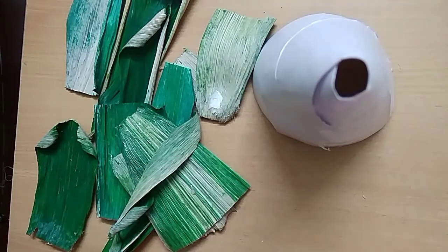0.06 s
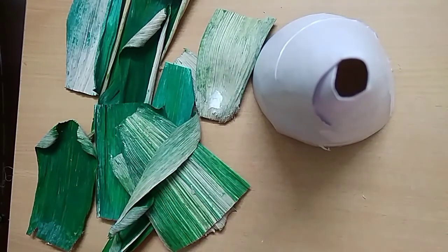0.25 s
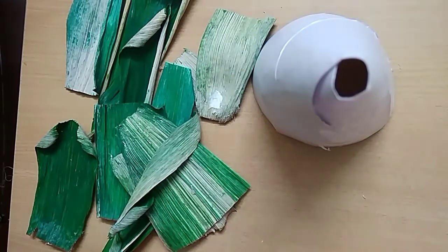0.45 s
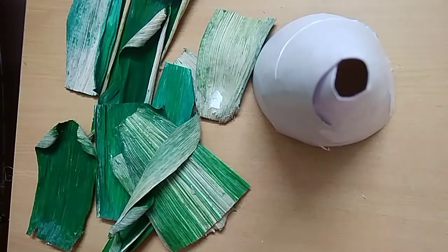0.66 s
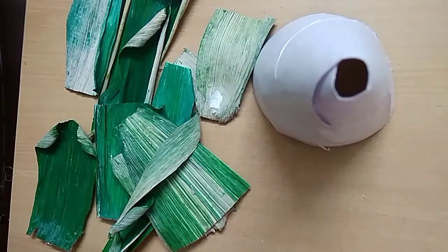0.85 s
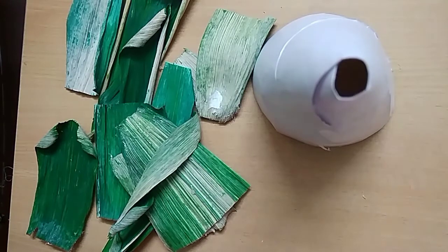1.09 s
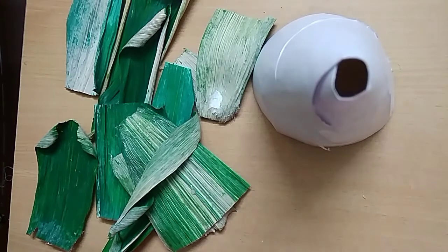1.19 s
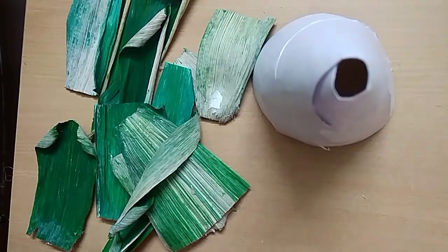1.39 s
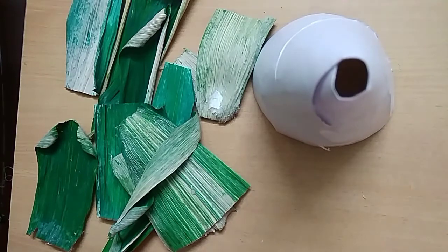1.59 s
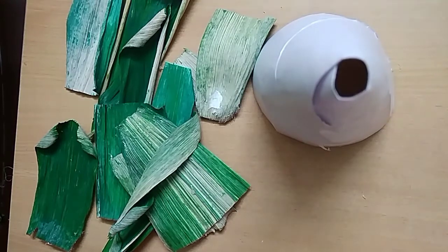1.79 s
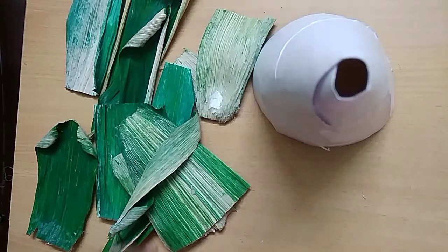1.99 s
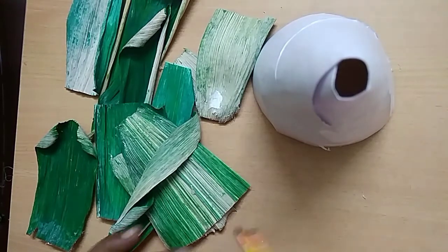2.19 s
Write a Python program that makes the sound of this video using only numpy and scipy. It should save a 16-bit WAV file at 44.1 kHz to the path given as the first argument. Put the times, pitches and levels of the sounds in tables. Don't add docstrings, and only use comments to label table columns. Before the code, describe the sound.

Dry husks rustle in short uneven bursts as hands gather them on a table, with brittle snaps and dull knocks, over a faint low appliance hum; close stereo phone microphone in a small hard room.

```python
import sys
import numpy as np
from scipy import signal
from scipy.fft import rfft, irfft
from scipy.io import wavfile
from scipy.ndimage import uniform_filter1d

SR = 44100
rng = np.random.default_rng(int(sys.argv[2]) if len(sys.argv) > 2 else 0)


def amplitude_ratio(level_db):
    exponent = np.asarray(level_db, float) / 20
    return 10 ** exponent


def log_audio(samples):
    frames = np.atleast_2d(samples).T
    limited = np.clip(frames, -1, 1)
    pcm = np.round(limited * 32767).astype(np.int16)
    wavfile.write(sys.argv[1], SR, pcm)


N = 99225
SPAN = 16384
LN_1000 = np.log(1000)


def curve(table, size):
    hz, db = np.array(table, float).T
    bin_hz = np.arange(size // 2 + 1) * SR / size
    return np.interp(np.log(bin_hz + 1), np.log(hz), db)


def colour(x, db):
    size = 2 * (len(db) - 1)
    cepstrum = irfft(db * np.log(10) / 20)
    cepstrum[1:size // 2] *= 2
    cepstrum[size // 2 + 1:] = 0
    h = irfft(np.exp(rfft(cepstrum)))
    return signal.fftconvolve(x, h / np.sqrt(np.sum(h ** 2)))[:len(x)]


def band(x, hz, width_hz):
    edges = np.clip([hz - width_hz / 2, hz + width_hz / 2], 5, SR / 2.1)
    return signal.sosfilt(signal.butter(1, edges, "band", fs=SR, output="sos"), x)


def unit(x):
    return x / np.sqrt(np.mean(x ** 2))


def walk(rate_hz):
    k = int(SR / rate_hz)
    return unit(uniform_filter1d(uniform_filter1d(rng.standard_normal(N), k), k))


def burst(fade_s):
    t = np.arange(2048) / SR
    h = rng.standard_normal(len(t)) * np.exp(-t / fade_s)
    return h / np.sqrt(np.sum(h ** 2))


def lean(pair, table):
    tilt_db = curve(table, N) / 2
    return np.array([irfft(rfft(p) * amplitude_ratio(s * tilt_db), N) for p, s in zip(pair, (1, -1))])


# freq_hz, level_db (per Hz)
HUM_TONE = [(20, -35.5), (55, -7), (240, -5.5), (330, -16.5), (500, -23.5), (700, -41), (1200, -63.5),
            (16000, -63)]
# freq_hz, width_hz, level_db
HUM_BANDS = [(58.3, 8.4, -63), (123.4, 21, -59), (176.8, 22.2, -60), (228.2, 27.4, -59.5)]
# freq_hz, left_minus_right_db
HUM_SIDE = [(60, 5.5), (250, 6), (500, 19), (2000, 16.5), (6000, -7.5)]


def hum():
    rumble_db, swell_db, likeness = -56, 3, 0.81

    def one_rumble():
        x = amplitude_ratio(rumble_db) * unit(colour(rng.standard_normal(N), curve(HUM_TONE, 8192)))
        for hz, width_hz, db in HUM_BANDS:
            tone = rng.standard_normal(N)
            for _ in range(3):
                tone = band(tone, hz, width_hz * 2)
            x += amplitude_ratio(db + swell_db * walk(2.8)) * unit(tone)
        return x

    shared = np.sqrt((1 + likeness) / 2) * one_rumble()
    differing = np.sqrt((1 - likeness) / 2) * one_rumble()
    return lean([shared + differing, shared - differing], HUM_SIDE)


# freq_hz, level_db (per Hz)
SLIDE_TONE = [(300, -32), (700, -26.5), (1500, -6.5), (2100, -11.5), (2800, -9), (4500, -13), (11000, -0.5),
              (15500, -7)]


def slide_colour(x):
    return colour(x, curve(SLIDE_TONE, 1024))


# freq_hz, level_db (per Hz)
CRUSH_TONE = [(120, -10), (280, -5.5), (470, 3), (750, 0.5), (1100, -5.5), (2000, -7), (5500, -8),
              (9000, -14)]


def crush_colour(x):
    return colour(x, curve(CRUSH_TONE, 1024))


def swarm():
    clicks_per_s, size_spread_db, flicker_db = 13000, 3.5, 1.45
    happens = rng.random(N) < clicks_per_s / SR
    size_db = np.minimum(-np.log(rng.random(N) + 1e-9), 5) * size_spread_db
    clicks = amplitude_ratio(size_db) * happens * np.sign(rng.standard_normal(N))
    return unit(clicks) * amplitude_ratio(flicker_db * walk(285))


def heap():
    return [(slide_colour(swarm()), crush_colour(swarm())) for _ in range(3)]


def placed(x):
    left_lag_s = 0.000264 + .00009 * rng.standard_normal()
    scatter_s, scatter_db, scatter_hz = 0.0038, -2.5, 915
    w = 2j * np.pi * np.arange(SPAN // 2 + 1) * SR / SPAN
    treble_only = (w / (w + 2 * np.pi * scatter_hz)) ** 2
    out = []
    for lag_s in (left_lag_s, 0):
        glint = amplitude_ratio(scatter_db) * rfft(burst(scatter_s), SPAN) * treble_only
        out.append(irfft(rfft(x) * (1 + glint) * np.exp(-w * lag_s)))
    return np.array(out)


def rub(spots, moves):
    rise_db, release_s = 22, 0.0063
    out, t = np.zeros((2, N + 2 * SPAN)), np.arange(SPAN) / SR
    for start_s, rise_s, hold_s, level_db, crush_db in moves:
        risen = t / max(rise_s, 1e-3)
        up = amplitude_ratio(rise_db * (np.clip(risen, 0, 1) - 1)) * np.clip(3 * risen, 0, 1)
        down = np.exp(-np.maximum(t - rise_s - hold_s, 0) / release_s)
        shape = amplitude_ratio(level_db) * up * down / np.sqrt(len(spots))
        i = max(int(start_s * SR), 0)
        for slide, crush in spots:
            rustle = np.roll(slide + amplitude_ratio(crush_db) * crush, -i)[:SPAN]
            out[:, i:i + SPAN] += placed(shape * rustle)
    return out[:, :N]


# start_s, hold_s, level_db
BRUSHES = [(0, 0.051, -69.5), (0.23, 0.11, -56.5), (0.854, 0.048, -57.5), (0.875, 0.041, -54),
           (0.934, 0.082, -56.5), (1.024, 0.05, -44.5), (1.076, 0.046, -45), (1.488, 0.079, -74.5),
           (1.948, 0.042, -55), (2.128, 0.032, -57.5), (2.16, 0.028, -66)]


def brushes(spots):
    rise_s, crush_db = 0.004, -8.5
    return rub(spots, [(start_s, rise_s, hold_s, db, crush_db) for start_s, hold_s, db in BRUSHES])


# start_s, peak_db
SNAPS = [(.050, -66.5), (.152, -60), (0.175, -33), (0.203, -41), (.206, -35.5), (.2244, -26.5), (.470, -21),
         (.4738, -13.5), (.859, -40.5), (.8904, -46), (.908, -35), (1.2405, -23), (1.2589, -21),
         (1.263, -27), (1.2655, -12), (1.2667, -9.5), (1.4736, -41), (1.6077, -46), (1.882, -24),
         (1.901, -32), (1.911, -19), (1.9135, -21), (2.1352, -61), (2.169, -38), (2.181, -41.5)]


def snaps():
    fade_s, gain_db, body_db = 0.00084, 5.5, -7
    out = np.zeros((2, N + 2 * SPAN))
    for start_s, peak_db in SNAPS:
        i = int(start_s * SR)
        puff = np.pad(burst(fade_s), (0, SPAN))[:SPAN]
        puff = slide_colour(puff) + amplitude_ratio(body_db) * crush_colour(puff)
        out[:, i:i + SPAN] += amplitude_ratio(peak_db + gain_db) * placed(puff)
    return out[:, :N]


# start_s, rise_s, hold_s, level_db, crush_db (crush against slide)
STROKES = [(.14, 0.036, .02, -52.5, -10), (.195, .012, 0.023, -42.5, -6.5),
           (.32, 0.028, 0.039, -32.5, -13.5), (.36, 0.033, 0.073, -34, -5), (.445, 0.024, 0.0043, -28, -11),
           (.479, .003, .012, -40, -9), (.972, 0.022, 0.032, -35, -33), (1.13, 0.11, .025, -32, -5.5),
           (1.25, 0.014, 0.0011, -30, -9.5), (1.272, 0.0045, 0.0071, -41.5, -10.5),
           (1.45, .02, 0.0056, -50.5, -5.5), (1.604, 0.006, .1, -48, -7.5), (1.7, 0.017, 0.025, -36.5, -37),
           (1.68, 0.21, .03, -35.5, -6.5), (1.85, .045, 0.019, -31, -7.5),
           (1.917, 0.0044, .022, -39.5, -13), (2.21, 0.039, .01, -44, -6.5)]


def strokes(spots):
    return rub(spots, STROKES)


# start_s, level_db, pitch_hz
THUDS = [(.160, -47.5, 418), (.203, -36, 297), (.205, -42, 109), (.385, -45, 533), (.425, -34, 437),
         (.445, -36, 395), (.476, -37, 107), (.68, -64, 880), (1.195, -44, 775), (1.215, -42, 706),
         (1.235, -42, 513), (.862, -47.5, 500), (.905, -44, 1580), (1.262, -37.5, 143),
         (1.473, -51.5, 1490), (1.64, -47.5, 650), (1.905, -33.5, 229), (1.922, -34, 117),
         (2.225, -42, 182.6)]


def thuds():
    t, out = np.arange(N) / SR, np.zeros(N)
    for start_s, level_db, pitch_hz in THUDS:
        since = np.maximum(t - start_s, 0)
        t60_s = 12.7 / pitch_hz + .02
        out += amplitude_ratio(level_db) * np.sin(2 * np.pi * pitch_hz * since) * np.exp(-LN_1000 * since / t60_s)
    return out * amplitude_ratio(np.array([[2], [-2]]))


# freq_hz, t60_s, level_db
ROOM_FADES = [(352, 0.45, -2), (770, 0.34, -5), (1680, 0.54, -4.5), (2960, 0.47, -3), (6400, 0.38, -9),
              (12000, 0.36, -8)]
# freq_hz, left_minus_right_db
ROOM_SIDE = [(200, 12), (600, 3), (1300, 8), (2500, 3.5), (10000, -3)]


def room(husks):
    build_s, left_db = 0.0069, 2
    t, tail = np.arange(SR // 2) / SR, []
    for side in (1, -1):
        echo = np.zeros(len(t))
        for hz, t60_s, db in ROOM_FADES:
            noise = band(rng.standard_normal(len(t)), hz, hz * 0.71)
            level = amplitude_ratio(db) * np.sqrt(2 * LN_1000 / t60_s / SR)
            echo += level * noise * np.exp(-LN_1000 * t / t60_s)
        echo *= np.clip(t / build_s, 0, 1)
        tail.append(amplitude_ratio(side * left_db / 2) * signal.fftconvolve(husks[1], echo)[:N])
    return lean(tail, ROOM_SIDE)


# freq_hz, left_minus_right_db
SHADOW = [(100, 2), (400, 8.5), (700, 2), (1300, 11.5), (2400, -4), (4400, -2.5), (8000, -0.5),
          (15000, -10.5)]


def shadowed(husks):
    return lean(husks, SHADOW)


def scene():
    spots = heap()
    husks = brushes(spots) + snaps() + strokes(spots)
    return hum() + shadowed(husks) + thuds() + room(husks)


# freq_hz, share_of_time (0-1)
MISSING = [(1500, 0), (3500, .03), (4400, .3), (7500, .27), (9000, .09), (15000, .1)]


def thin_treble(x):
    frame, band_bins, hold_frames = 1024, 5, 7
    dropped_db, mute_below_db, mute_above_hz = -32, -106, 9000
    hz, _, z = signal.stft(x, SR, nperseg=frame)
    luck = rng.standard_normal((len(hz) // band_bins + 1, z.shape[-1]))
    luck = uniform_filter1d(luck, hold_frames, axis=1)
    rank = luck.ravel().argsort().argsort().reshape(luck.shape) / luck.size
    rank = np.repeat(rank, band_bins, axis=0)[:len(hz)]
    drop = rank < np.interp(hz, *np.array(MISSING, float).T)[:, None]
    power = np.mean(abs(z) ** 2, axis=0)
    power = uniform_filter1d(uniform_filter1d(power, size=30, axis=0), size=3, axis=1)
    drop |= (power < amplitude_ratio(2 * mute_below_db)) & (hz > mute_above_hz)[:, None]
    return signal.istft(z * np.where(drop, amplitude_ratio(dropped_db), 1), SR, nperseg=frame)[1][:, :N]


def top_cut(x):
    return signal.sosfilt(signal.butter(12, 16770, fs=SR, output="sos"), x)


def record(dry):
    top_hz = 15750
    cut = signal.sosfilt(signal.ellip(12, .3, 80, top_hz, fs=SR, output="sos"), dry)
    mix = thin_treble(cut)
    return top_cut(mix)


dry = scene()
out = record(dry)
log_audio(out)
```